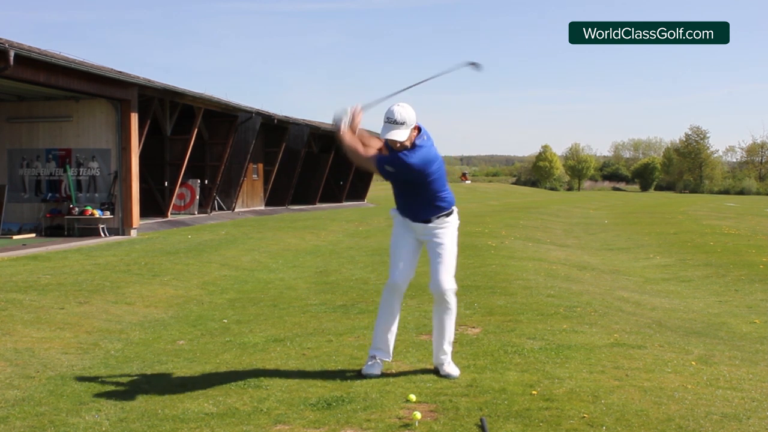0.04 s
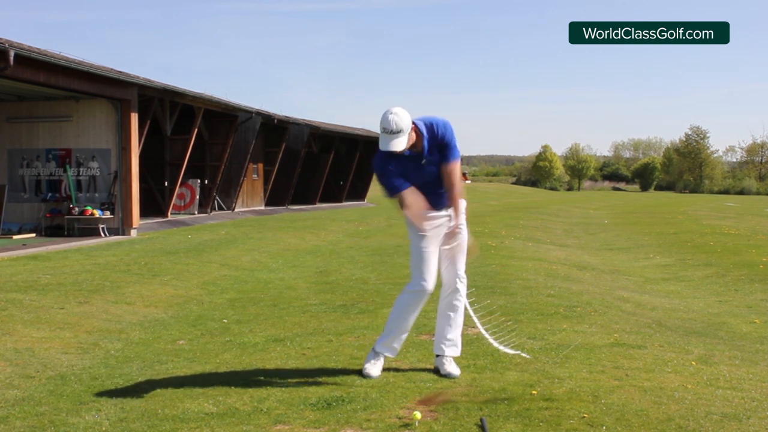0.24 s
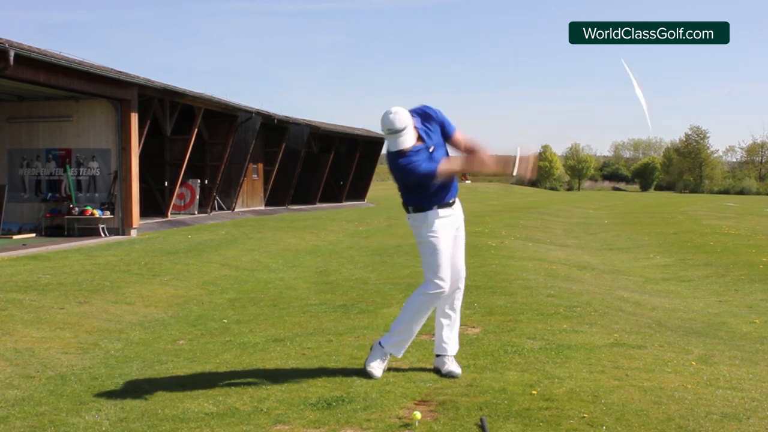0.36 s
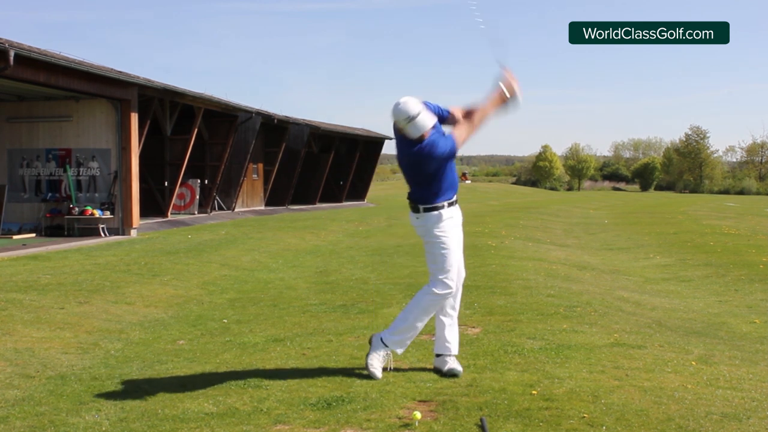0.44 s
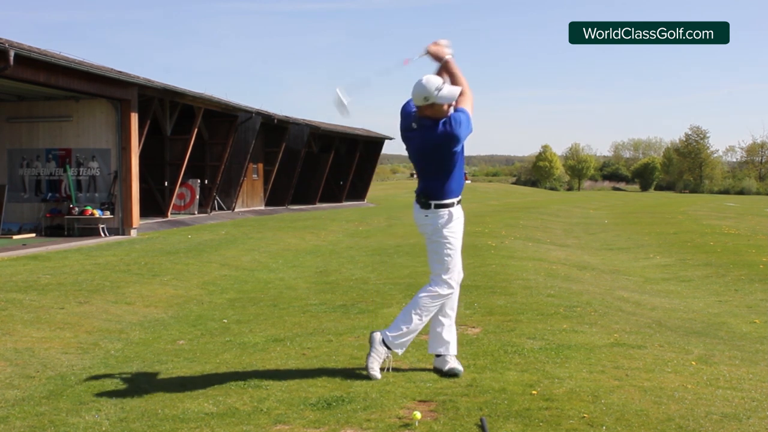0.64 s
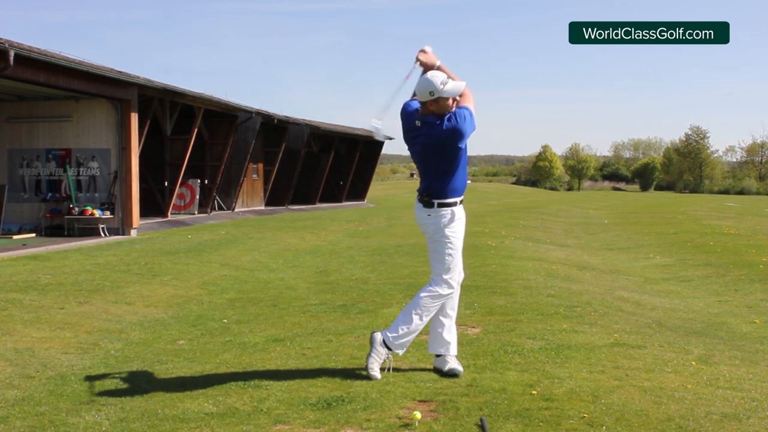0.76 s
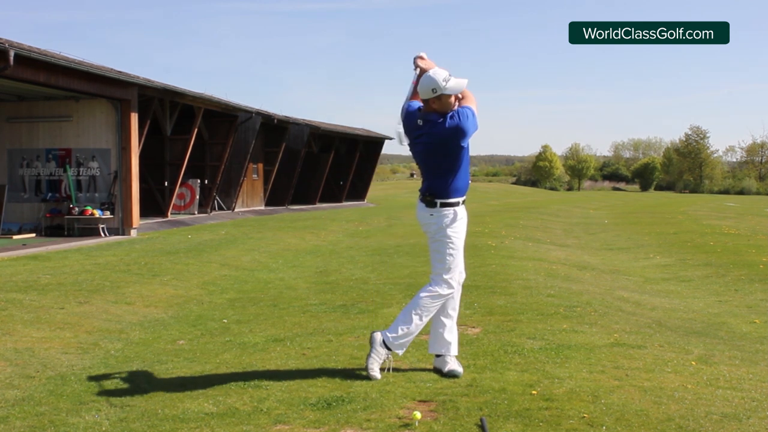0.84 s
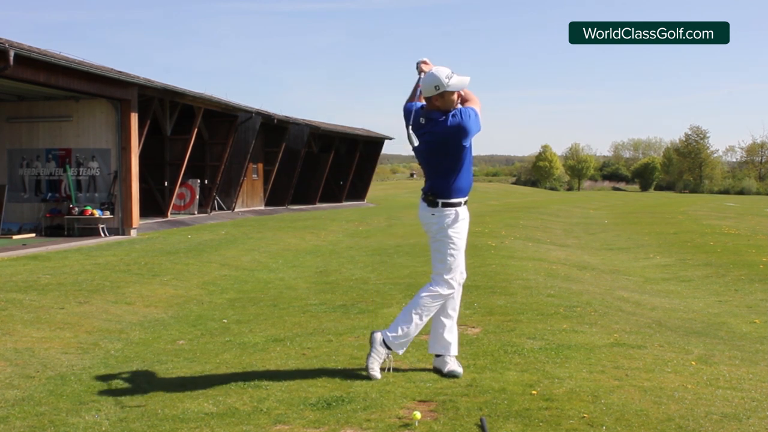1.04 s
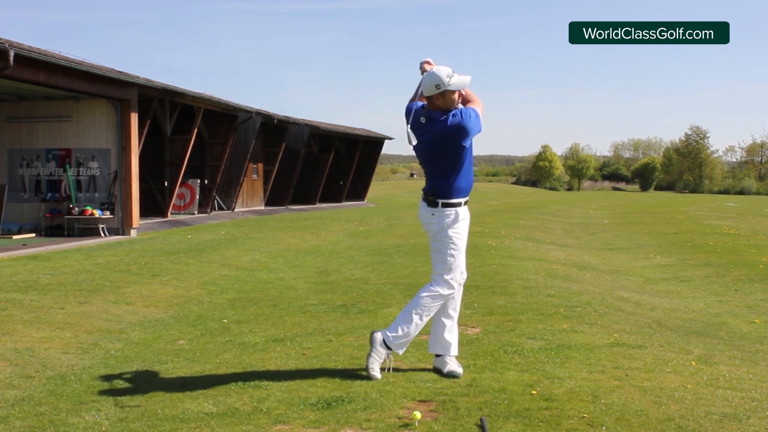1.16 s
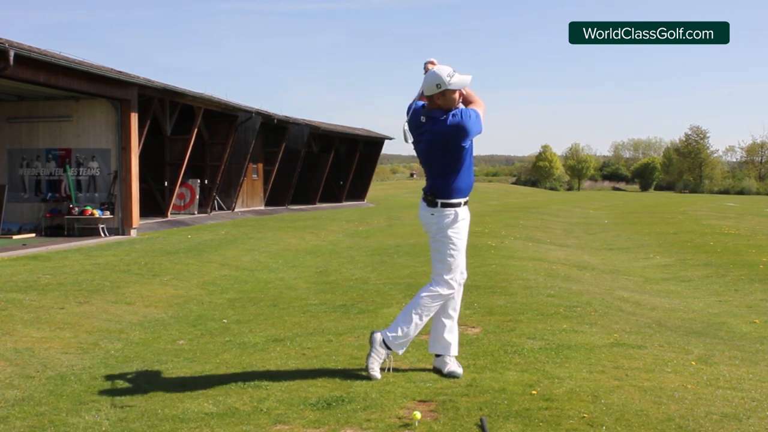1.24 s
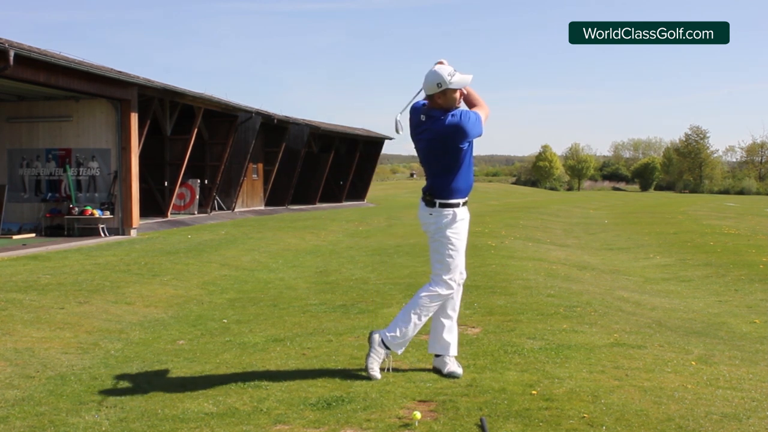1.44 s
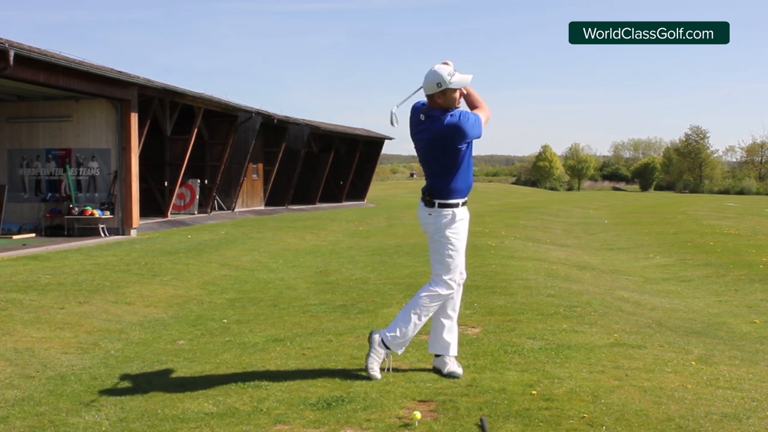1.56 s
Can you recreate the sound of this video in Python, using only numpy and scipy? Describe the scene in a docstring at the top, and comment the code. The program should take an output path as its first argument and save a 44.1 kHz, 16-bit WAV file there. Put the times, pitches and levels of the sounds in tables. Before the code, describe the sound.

A golf iron swishes down and hits a ball off the turf with one loud, sharp crack and a very brief echo. Light wind rumbles on the close microphone, clothes rustle softly, and faint birds chirp over a quiet field.

```python
"""Iron shot, close up

An iron swishes down and cracks a golf ball off the turf; the range shelter slaps the click back.
Air buffets the microphone, clothes rustle, shoes tick; birds and a soft scuff sound over a quiet field.
The strike overloads the recorder, whose gain ducks and recovers."""
import sys
import numpy as np
from scipy import signal
from scipy.fft import rfft, irfft, next_fast_len
from scipy.io import wavfile

SR = 44100
rng = np.random.default_rng(int(sys.argv[2]) if len(sys.argv) > 2 else 0)


def unload_audio(sound):
    """Save the sound as a 16-bit wav file, at the path given as the first command line argument."""
    columns = np.transpose(np.atleast_2d(sound))
    # keep every value between -1 and 1, then stretch to whole-number steps
    steps = np.round(np.clip(columns, -1, 1) * 32767)
    wavfile.write(sys.argv[1], SR, steps.astype(np.int16))


N = 70560
STRIKE_S = .246  # the face meets the ball

# Gusts on the microphone. Each row: time in seconds, level in dB.
GUSTS = [(0, -58), (.04, -49.5), (.083, -34), (.115, -40), (.148, -36.5), (.18, -57), (.245, -38),
         (.32, -33), (.39, -56), (.45, -43), (.51, -35), (.575, -36.5), (.625, -53.5), (.652, -39.5),
         (.695, -56), (.8, -61), (1.08, -64.5), (1.22, -56), (1.35, -74), (1.6, -66)]
# Swells of cloth. Each row: peak time, rise and fall in seconds, level in dB.
CLOTH_SWELLS = [(.083, 0.018, 0.018, -42), (.06, 0.064, 0.031, -51), (.16, 0.02, 0.012, -45),
                (.36, 0.046, .045, -51), (.46, 0.013, 0.02, -50.5), (.55, 0.065, 0.099, -56.5),
                (0.849, 0.36, 0.13, -63)]
# Shoes shifting. Each row: start in seconds, level in dB, brightness in Hz, t60 in seconds.
SHOE_TICKS = [(0.12, -46.5, 1110, 0.057), (0.662, -55, 3370, 0.028), (0.7539, -45.5, 1460, 0.015),
              (0.783, -51, 3800, 0.0029), (.858, -46, 560, .032)]
# The swing. Each row: time in seconds, club head speed in m/s.
CLUB_SPEED = [(0.1, 7), (0.155, 15), (0.19, 25), (0.21, 27), (0.224, 33), (0.244, 39), (0.27, 31),
              (0.29, 25), (0.32, 13), (0.4, 7)]
# Ring of club head and ball. Each row: pitch in Hz, relative level in dB, t60 in seconds.
RING_MODES = [(1430, -20, .014), (1790, -25, .014), (2490, -25, .014), (3115, -17, .021), (3490, -16, .023),
              (3765, -22, .016), (4350, -20, .01), (4620, -19, .01), (4960, -16, .011), (7080, -26, .012),
              (8300, -22, .009), (8650, -20, .011), (10100, -24, .01), (10660, -23, .011),
              (13800, -24, .011)]
# The small bird. Each row: start and length in seconds, level in dB.
BIRD_CHIRPS = [(0.582, 0.076, -56.5), (.934, 0.086, -62.5), (1.138, 0.1, -63), (1.491, 0.082, -60)]
# The farther bird's scoop. Each row: time in seconds, pitch in Hz.
FAR_BIRD_PITCH = [(1.37, 2030), (1.42, 1920), (1.47, 1850), (1.51, 1885), (1.55, 2050)]

# Tone curves. Each row: frequency in Hz, relative level in dB.
BUFFET_EQ = [(20, -13), (45, -6), (85, 1.5), (130, -3), (210, -15), (320, -25), (700, -50.5), (2000, -58)]  # deep wind rumble
HUSH_EQ = [(20, 22.5), (100, 11.5), (250, 6.5), (500, 3), (1000, -1), (2000, -5), (4000, -6.5),
           (8000, -7.5), (12000, -5), (15500, -10)]  # quiet field
WIDE_EQ = [(20, 31.5), (100, -3.5), (500, -2.5), (2000, -5), (8000, -4), (15000, -5.5)]  # hiss that differs between the ears
CLOTH_EQ = [(100, 13), (400, 1), (1200, 1.5), (2000, -3), (3500, -3.5), (5500, -6), (11000, -4),
            (15000, -7.5)]  # soft rustle
TORN_AIR_EQ = [(60, -17.5), (200, 3.5), (600, 8), (1100, -3), (1700, -3.5), (3000, -6.5), (5500, -10.5),
               (8000, -15.5), (15000, -17.5)]  # body of the swish
CRACK_EQ = [(100, 2.5), (600, -7), (2000, -10), (5000, -3.5), (7000, -21), (10000, -9), (15000, -24)]  # ball against face
SPRAY_EQ = [(500, -7), (3000, -12), (8000, -3.5), (15000, -2)]  # bright grass and crumbs
SOIL_EQ = [(30, -15), (100, -11.5), (250, -1), (500, -1.5), (900, -11.5), (3000, -53)]  # dull thump
SLAP_EQ = [(100, -12), (600, -9), (1400, -12), (2100, 6), (3200, 0), (4500, -8), (8000, -10), (15000, -8)]  # hard shelter reflection
SCATTER_EQ = [(100, -14), (700, 8.5), (3500, -8.5), (8000, -6), (15000, -18.5)]  # tail from shelter and trees
SCUFF_EQ = [(100, -8.5), (380, 5.5), (700, -13), (1400, -0.5), (2100, -5), (3000, -26), (15000, -30)]  # soft scuff


def amp(db):
    """Decibels to gain."""
    return 10 ** (np.asarray(db) / 20)


def unit(x):
    """Scaled to rms 1."""
    return x / np.sqrt(np.mean(x ** 2) + 1e-20)


def clock():
    """The time of each sample in seconds."""
    return np.arange(N) / SR


def curve(rows):
    """An automation line through (seconds, value) rows."""
    return np.interp(clock(), *np.transpose(rows))


def colour(x, eq):
    """Minimum-phase EQ through (Hz, dB) points, so nothing rings ahead of a hit."""
    size = 2 * next_fast_len(N)
    hz, db = np.transpose(eq)
    bins_hz = np.fft.rfftfreq(size, 1 / SR)
    gain = amp(np.interp(np.log(bins_hz + 1), np.log(hz), db))
    cepstrum = irfft(np.log(gain))
    cepstrum[1:size // 2] *= 2
    cepstrum[size // 2 + 1:] = 0
    return irfft(rfft(x, size) * np.exp(rfft(cepstrum)))[:N]


def noise(eq):
    """Coloured noise of rms 1."""
    return unit(colour(rng.standard_normal(N), eq))


def lowpass(x, hz):
    """A gentle treble roll-off."""
    return signal.sosfilt(signal.butter(2, hz, fs=SR, output="sos"), x)


def soft_noise(hz):
    """Low-passed noise of rms 1."""
    return unit(lowpass(rng.standard_normal(N), hz))


def decay(start, t60):
    """A hard attack that falls 60 dB in t60 seconds."""
    t = clock() - start
    return (t >= 0) * np.exp(-np.log(1000) * np.abs(t) / t60)


def wind_buffet():
    """Air rumbles on the microphone, at an even strength within each gust."""
    eddies = signal.hilbert(noise(BUFFET_EQ))
    evened = unit(eddies.real / np.sqrt(np.abs(eddies) + .5))
    return amp(curve(GUSTS)) * evened


def field_hush():
    """A steady bed of quiet air."""
    return amp(-58) * noise(HUSH_EQ)


def clothes():
    """Cloth rustles with each turn of the body."""
    t = clock()
    power = np.zeros(N)
    for peak, rise, fall, db in CLOTH_SWELLS:
        width = np.where(t < peak, rise, fall)
        power += amp(db) ** 2 * np.exp(-((t - peak) / width) ** 2)
    return np.sqrt(power) * noise(CLOTH_EQ)


def shoes():
    """Shoes tick on the turf, with the dull push of the sole underneath."""
    push_hz = 197
    out = np.zeros(N)
    for start, db, bright_hz, t60 in SHOE_TICKS:
        push = amp(1) * np.sin(2 * np.pi * push_hz * (clock() - start))
        out += amp(db) * decay(start, t60) * (push + soft_noise(bright_hz))
    return out


def swish():
    """The club sheds whistling vortices and tears the air: pitch and level ride its speed."""
    reference_m_s, whistle_hz = 38, 660  # the pitch at that speed
    passed_db, passing_s = -10.5, .0027  # the drop once the club has passed
    speed = curve(CLUB_SPEED) / reference_m_s
    flutter = lowpass(rng.standard_normal(N) + 1j * rng.standard_normal(N), hz=96)
    flutter /= np.sqrt(np.abs(flutter) + 1e-9)
    tone = np.exp(2j * np.pi * np.cumsum(whistle_hz * speed) / SR)
    whistle = amp(-22.5) * speed ** 4.17 * unit(np.real(flutter * tone))
    hiss = amp(-28) * speed ** 3.58 * noise(TORN_AIR_EQ)
    passed = np.clip((clock() - STRIKE_S) / passing_s, 0, 1)
    return amp(passed_db * passed) * (whistle + hiss)


def ball_contact():
    """The ball squashes and springs back for a few punchy cycles, scraping on the grooves."""
    thud_hz, contact_s = 1151, .0027
    t = clock() - STRIKE_S
    press = (t > 0) * (1 - np.clip(t / contact_s, 0, 1) ** 2)
    scrape = amp(-12) * noise(CRACK_EQ)
    thud = amp(-1) * np.sin(2 * np.pi * thud_hz * t)
    return press * (scrape - thud)


def turf():
    """The club's sole thumps the soil and throws up a clumpy spray of grass and crumbs."""
    clumps = amp(6 * soft_noise(hz=503))
    spray = amp(-30) * decay(STRIKE_S, t60=.17) * unit(clumps * noise(SPRAY_EQ))
    thump = amp(-22.5) * decay(STRIKE_S, t60=.027) * noise(SOIL_EQ)
    return spray + thump


def ball_click():
    """The ball leaves the face with a crack, and both ring briefly."""
    leave_s, attack_s = STRIKE_S + .0024, .0004
    t = clock() - leave_s
    ring = sum(amp(db) * decay(leave_s, t60) * np.sin(2 * np.pi * (hz * t + rng.random()))
               for hz, db, t60 in RING_MODES)
    crack = amp(-8.5) * decay(leave_s, t60=.0093) * noise(CRACK_EQ)
    return np.clip(t / attack_s, 0, 1) * (amp(4) * ring + crack)


def shelter_echo(click):
    """One slapback off the shelter, and a faint tail scattered by shelter and trees."""
    delay_s = .0358
    slap = np.interp(clock() - delay_s, clock(), colour(click, SLAP_EQ), left=0)
    scatter = noise(SCATTER_EQ) * decay(0, t60=1)
    tail = signal.fftconvolve(click, scatter / np.linalg.norm(scatter))[:N]
    return amp(-10) * slap + amp(-26) * tail


def small_bird():
    """Thin, wavering whistles that drop onto their pitch, then sag and fade."""
    pitch_hz, drop_hz, settle_s = 3686, 340, .0066
    sag_hz_per_s, waver_hz = 330, 24.8
    edge_s, fade_db = .008, -6
    out = np.zeros(N)
    for start, length, db in BIRD_CHIRPS:
        t = np.clip(clock() - start, 0, length)
        hz = pitch_hz + drop_hz * np.exp(-t / settle_s) - sag_hz_per_s * t
        hz += waver_hz * soft_noise(hz=150)
        gate = np.clip(np.minimum(t, length - t) / edge_s, 0, 1)
        out += amp(db + fade_db * t / length) * gate * np.sin(2 * np.pi * np.cumsum(hz) / SR)
    return out


def scuff():
    """A soft scuff over the quiet field."""
    peak_s, width_s = 1.295, .07
    return amp(-67) * np.exp(-((clock() - peak_s) / width_s) ** 2) * noise(SCUFF_EQ)


def far_bird():
    """One faint whistle that scoops down and back up."""
    start, end = FAR_BIRD_PITCH[0][0], FAR_BIRD_PITCH[-1][0]
    progress = np.clip((clock() - start) / (end - start), 0, 1)
    arch = np.sqrt(np.abs(np.sin(np.pi * progress)))
    return amp(-72) * arch * np.sin(2 * np.pi * np.cumsum(curve(FAR_BIRD_PITCH)) / SR)


def scene():
    """The whole mix sits in the centre; only a faint hiss is wide."""
    click = ball_click()
    mid = wind_buffet() + field_hush() + scuff() + clothes() + shoes()
    mid += swish() + ball_contact() + turf() + click + shelter_echo(click)
    mid += small_bird() + far_bird()
    side = amp(-58.5) * noise(WIDE_EQ)
    return np.array([mid + side, mid - side])


def record(dry):
    """Overload ducks the gain for a moment, too late to stop clipping; the top treble is cut."""
    threshold_db, duck_db, ceiling, top_hz = -11, -11.5, .29, 15750
    attack_s, hold_s, release_s = .01, .064, .022
    t = clock()
    over = np.abs(dry).max(axis=0) > amp(threshold_db)
    since_over = t - np.maximum.accumulate(np.where(over, t, -10))
    duck = np.exp(-np.maximum(since_over - hold_s, 0) / release_s)
    pole = np.exp(-1 / (attack_s * SR))
    gain = amp(duck_db * signal.lfilter([1 - pole], [1, -pole], duck))
    clipped = np.clip(dry * gain, -ceiling, ceiling)
    return signal.sosfilt(signal.ellip(10, .1, 90, top_hz, fs=SR, output="sos"), clipped)


dry = scene()
out = record(dry)
unload_audio(out)
```